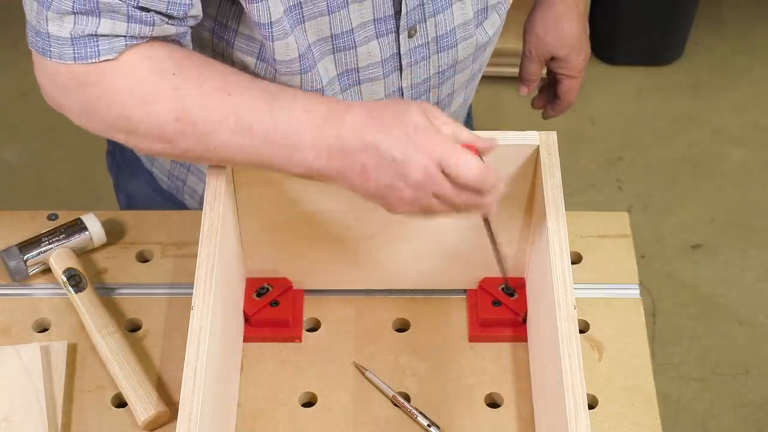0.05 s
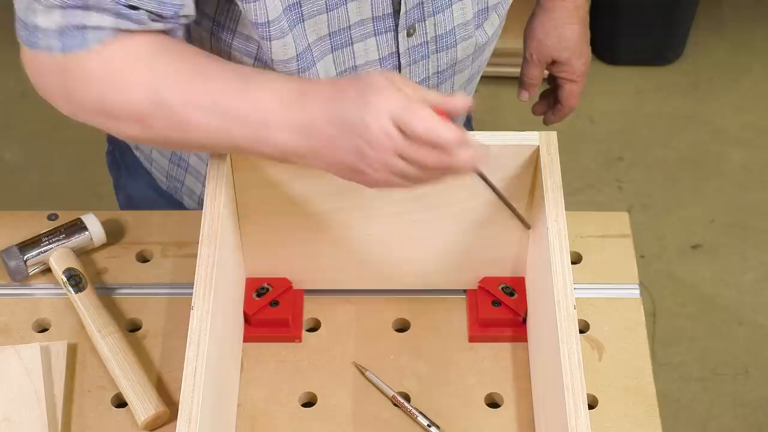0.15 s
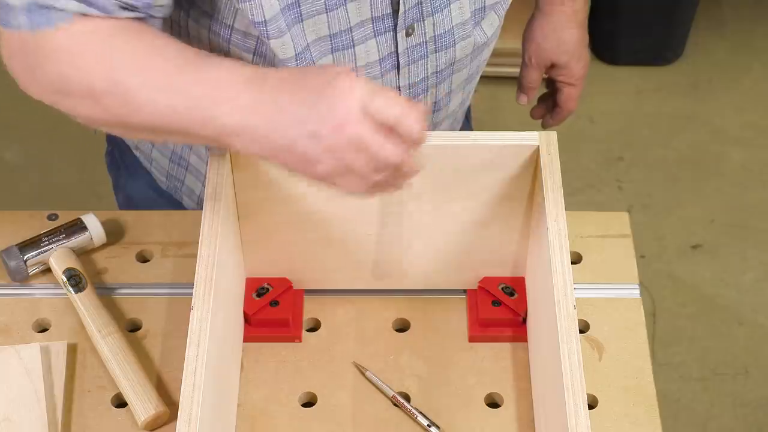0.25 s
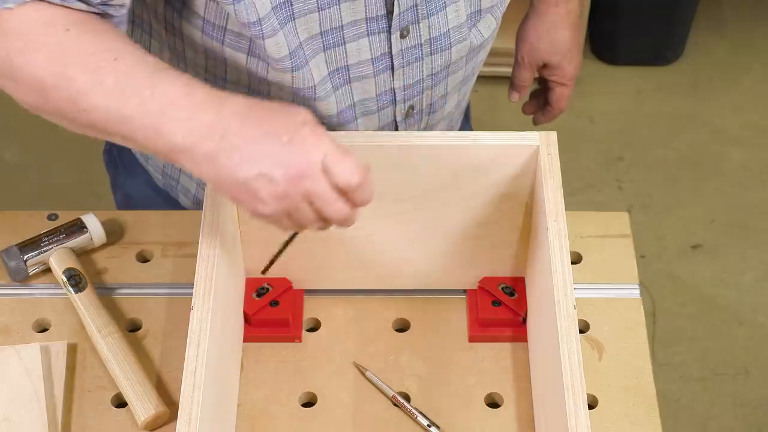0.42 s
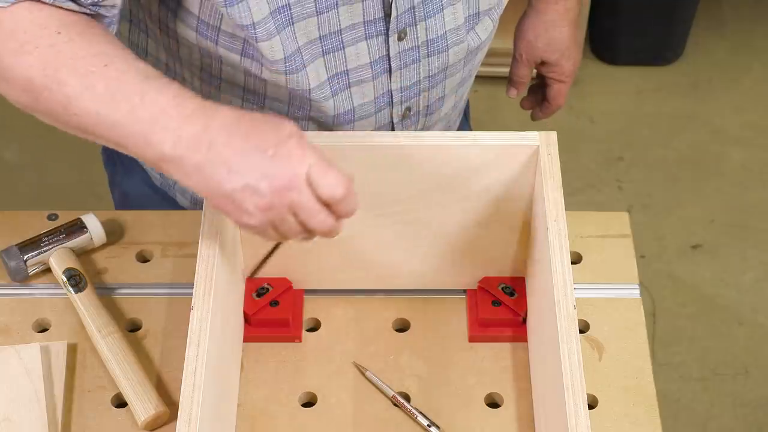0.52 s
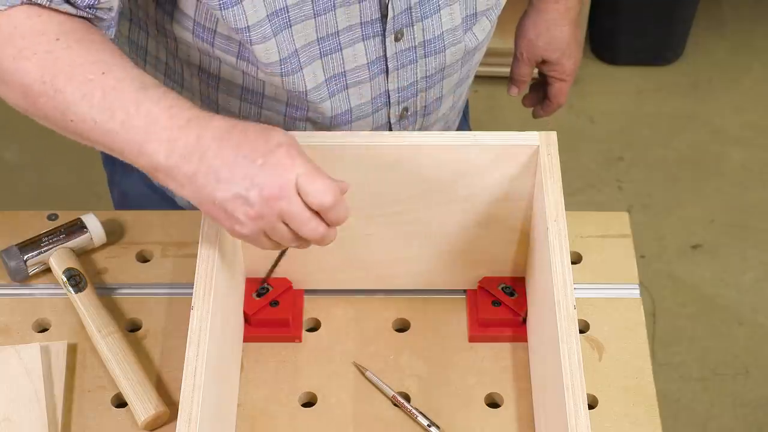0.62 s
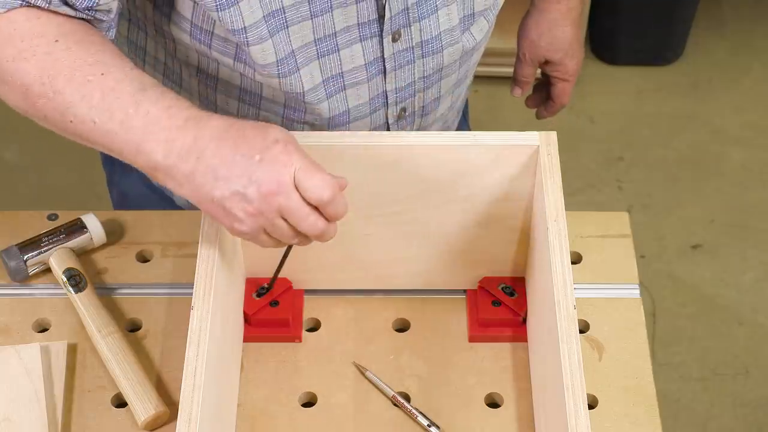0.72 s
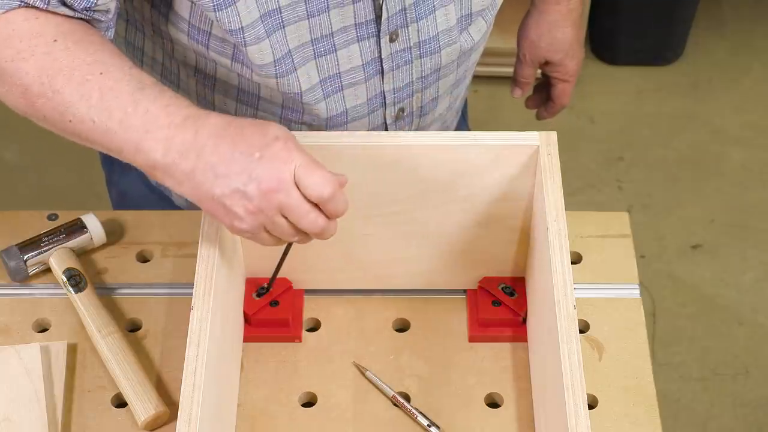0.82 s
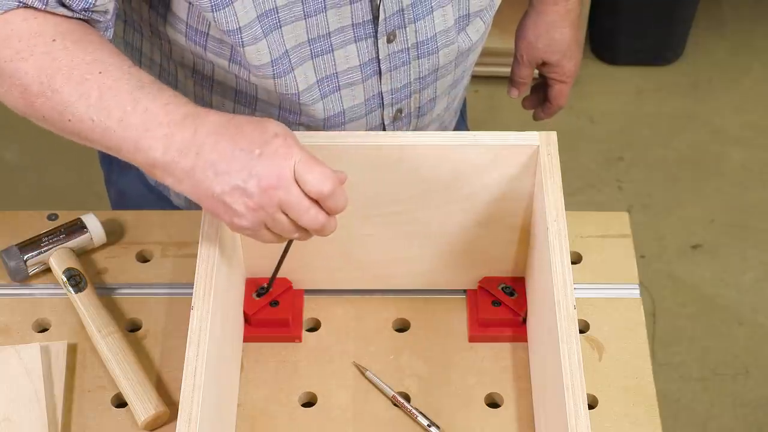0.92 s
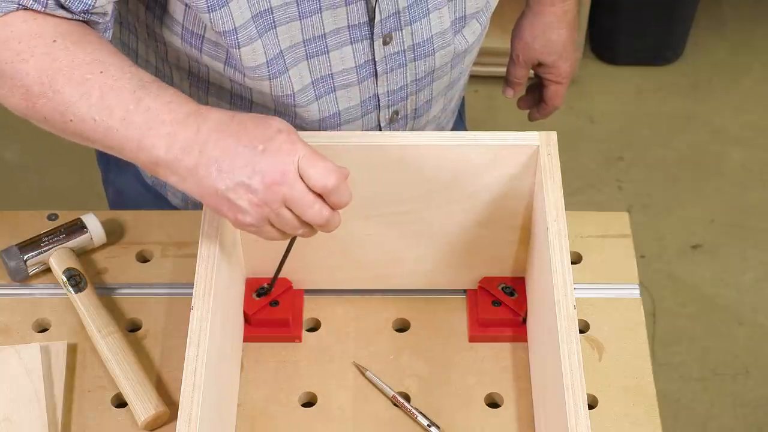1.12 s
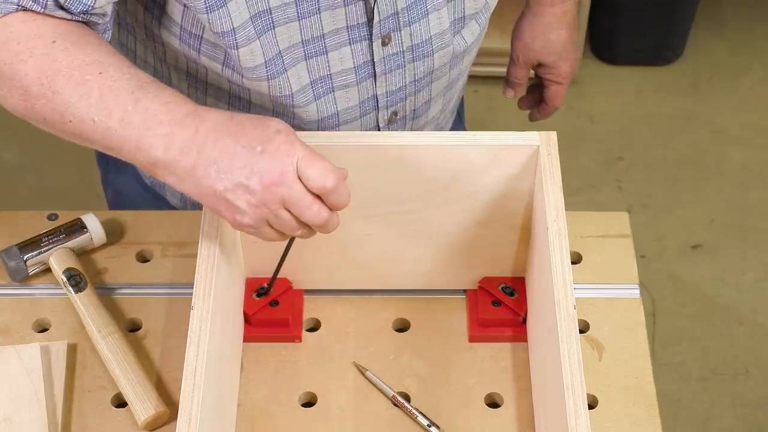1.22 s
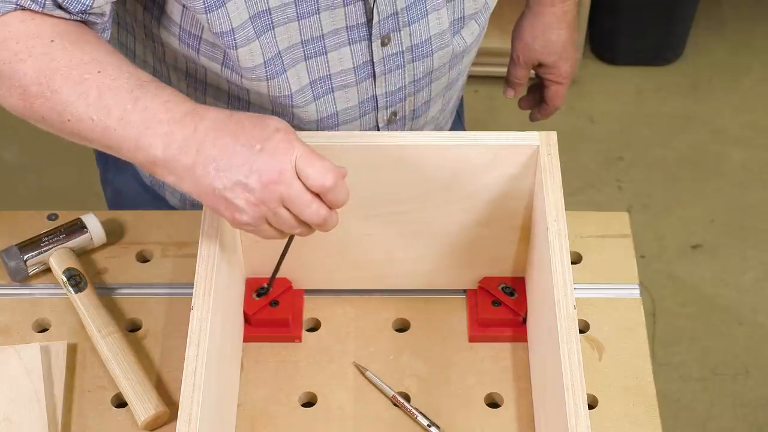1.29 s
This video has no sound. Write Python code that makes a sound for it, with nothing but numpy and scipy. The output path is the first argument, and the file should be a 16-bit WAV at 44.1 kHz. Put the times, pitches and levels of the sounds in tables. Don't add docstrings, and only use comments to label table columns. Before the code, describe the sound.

Hex key knocks loudly against a hollow plywood box, then ticks lightly into a steel clamp screw

```python
import sys
import numpy as np
from scipy import signal
from scipy.fft import rfft, irfft
from scipy.io import wavfile

SR = 44100
rng = np.random.default_rng(int(sys.argv[2]) if len(sys.argv) > 2 else 0)


def put_to_file(sound):
    columns = np.atleast_2d(sound).T
    safe = np.clip(columns, -1, 1)
    whole_steps = np.round(safe * 32767)
    wavfile.write(sys.argv[1], SR, whole_steps.astype(np.int16))


def volts_from_decibels(level):
    exponent = np.asarray(level, float) / 20
    return 10 ** exponent


N = 59535
T = np.arange(N) / SR

# frequency in Hz, level in dB, t60 in seconds.
CLAMP = [(372.3, 4, 0.089), (826, 4.5, 0.057), (1598, 7, 0.034), (2050, -14, 0.048), (2360, 4.5, 0.02),
         (3164, -15.5, 0.02), (3306, -5.5, 0.048), (4020, -5, 0.021), (5220, -16, 0.019), (1906, -6.5, .02),
         (3650, -8, 0.018), (4480, -12.5, 0.021)]
BOX = [(358, -15, 0.04), (406, -14.5, 0.056), (495.4, -22.5, 0.31), (542, -22, 0.053), (660, -11, 0.024),
       (687, -16, 0.075), (765, -34, 0.098), (825, -19, 0.12), (1120, -13.5, 0.034), (1499, -20.5, 0.081),
       (1810, -8.5, 0.032), (2052, -13.5, 0.041), (2308, -9.5, 0.025), (2430, -10, 0.015)]
SEAT = [(202, -5, 0.23), (376, 3.5, 0.13), (523, 3.5, 0.12), (675, 6.5, 0.025), (809, -1.5, 0.22),
        (1100, -0.5, 0.072), (1560, -9, 0.21), (1740, -1.5, 0.098), (2100, 0, 0.016), (2980, -6.5, 0.024),
        (3230, -6.5, 0.04)]
HOLLOW = [(345, -14, .045), (415, -9, .045), (500, 0, .042), (560, -13, .035)]
SLIP = [(1410, 0.5, 0.055), (2117, 10.5, 0.023), (3110, -6.5, 0.044), (2376, -3, 0.032), (5730, -13, 0.035)]
EDGE = [(327.4, 1.5, 0.064), (504.7, 2, 0.14), (1970, 0, 0.024), (2110, 0.5, .04), (2530, -7, 0.03),
        (2633, 2.5, 0.089), (3300, -3.5, 0.046), (3800, -6.5, .035), (6300, -5, .03), (8930, -2, 0.04)]
KEY = [(388.4, -15.5, 0.18), (875, 6, 0.023), (1086, -16, 0.055), (1511, -23.5, 0.15), (1662, 4, 0.044),
       (1886, -7, 0.039), (2117, -9, 0.039), (2423, -5, 0.028), (2494, -8, 0.051), (2642, 0.5, 0.029),
       (3220, -3.5, 0.034), (3289, 3.5, 0.041), (3390, -24, 0.24), (4230, -5.5, 0.021)]
TURN = [(421.6, -9.5, 0.24), (483, -4, 0.13), (1404, -5, 0.08), (1699, 4.5, 0.052), (1730, -10, 0.099),
        (2627, 6, 0.04), (3070, -15, 0.072), (3454, -7, 0.059), (4370, -12, 0.045), (4780, -5, 0.048),
        (6010, 5.5, 0.021)]
BACK = [(216, 10, 0.049), (391, -3, 0.14), (471, -5.5, 0.21), (1088, -11, 0.16), (1506, -15, 0.11),
        (1670, -2.5, 0.096), (1865, 1, 0.046), (2350, 0, 0.025), (2647, -8.5, 0.058), (3730, -3, 0.038),
        (4700, -15, 0.032)]
TICK = [(1650, 2, 0.0099), (2090, 2.5, 0.018), (2950, -4, .014), (3340, 1, 0.015), (5640, -11, .012)]

CONTACT_S = [.1663, .2021, .211, .2143, .2146, .2175, .232, .2415, .7084, .7677, .862, 1.0445, 1.0515,
             1.0585, 1.068, 1.0775, 1.082, 1.135, 1.249, 1.274]
# place, ring in dB, crack in dB, thud in dB, swell in ms, crack t60 in ms.
CONTACTS = [(CLAMP, -64.5, -43.5, -58.5, 0.25, 8.8), (CLAMP, -30.5, -30, -40, 0.55, 26.8),
            (EDGE, -66.5, -48.5, -68.5, 1.2, 22), (EDGE, -54, -41.5, -69, 0.51, 24),
            (BOX, -11.5, -27, -41, 1.3, 49), (HOLLOW, -3.5, -42, -44.5, 2.39, 26),
            (HOLLOW, -11.5, -48, -49.5, 2.3, 41), (HOLLOW, -13.5, -58.5, -49, 1.67, 41),
            (SEAT, -47, -64, -53.5, 0.41, 45), (KEY, -22.5, -30.5, -42, 5.5, 39),
            (EDGE, -49, -44, -58.5, 2.4, 46), (TICK, -52, -67, -78, 1.7, 13),
            (TICK, -56, -66, -72, 2.1, 11), (SLIP, -47.5, -72, -76, 4.9, 26),
            (TICK, -48, -61, -71, 1.3, 15), (TICK, -48.5, -58, -74, 2.2, 16), (TICK, -58, -69, -78, 2, 15),
            (TURN, -42.5, -40, -48, 4.6, 45), (HOLLOW, -51, -63, -49.5, 8.6, 50),
            (BACK, -45, -42.5, -50, 1.5, 33)]
# frequency in Hz, level in dB.
WOOD_CRACK = [(200, -5), (500, 6.5), (1200, 0), (2300, 2), (3900, -14), (8000, -22.5), (12000, -37.5),
              (16000, -53)]
# frequency in Hz, level in dB.
STEEL_CRACK = [(300, -16.5), (1000, 1.5), (3000, 0.5), (6000, -4), (9000, -9), (13000, -12), (16000, -32)]

SCRAPE_S = [.17, 1.048, 1.064, 1.079, .09, 1.257]
# length in seconds, steel in dB, wood in dB.
SCRAPES = [
    (0.027, -65.5, -51),
    (0.033, -66, -66),
    (0.018, -66, -72),
    (0.015, -62, -67.5),
    (0.029, -91.5, -69.5),
    (0.014, -69.5, -62),
]
# frequency in Hz, level in dB, t60 in seconds.
SCRAPE_RING = [(417, -13.5, 0.024), (1100, 0.5, 0.02), (1490, -8, 0.063), (1980, -4, 0.07),
               (2290, -2.5, .03), (3320, -4.5, 0.031), (4800, -4.5, 0.034), (6200, -5, 0.035)]
# frequency in Hz, level in dB.
WOOD_RUB = [(150, -18), (350, 7), (700, -14.5), (1100, -13), (2500, -8.5), (3500, -20), (16000, -51)]

# band centre in Hz, t60 in seconds, level in dB.
ROOM = [(120, 0.07, -34), (252, 0.51, -30), (550, 0.68, -28.5), (974, 0.57, -19.5), (1790, 0.58, -23),
        (4200, 0.52, -21.5), (7700, 1, -23.5), (13000, 0.23, -37.5)]
# frequency in Hz, level in dB.
HISS = [(24, -35.5), (40, -19), (71, -9), (87, 2.5), (204, -8.5), (237, -12), (269, -7.5), (646, -21),
        (16000, -27)]
# time in seconds, level in dB.
RUMBLE = [(0.0, -64), (0.25, -58.5), (0.582, -70.5), (0.74, -81.5), (0.92, -87), (1.35, -80)]
# time in seconds, level in dB.
SLEEVE = [(0, -1.5), (.5, -29), (.95, -13), (1.05, 7), (1.2, 6), (1.35, -3)]

HARD_DB = -40
BASS_LAG = 0.73
CRACK_SWELL = 0.42
THUD_HZ, THUD_T60_S = 387.3, 0.13
BENCH_HZ, BENCH_DB = 140, -13.5
RATTLE_HZ, BOX_RATTLE, KEY_RATTLE = 87, 0.39, 0.4
BOX_SEND_DB, BLOW_SEND_DB, RING_SEND_DB = -6.5, 4, -3
GRIT_PER_S, GRIT_DB, SCRAPE_HISS_DB = 5500, 3.5, -6.5
ECHO_S, ECHO_DB = 0.012, -13.5
ROOM_ONSET_S = 0.0078
HISS_DB, RUSTLE_DB, RUMBLE_TOP_HZ = -70, -73, 56.6
EARLIER_DB, EARLIER_T60_S = -71, 2.2


def noise():
    return rng.standard_normal(N)


def unit(x):
    return x / np.sqrt(np.mean(x ** 2))


def colour(x, points):
    freq = np.arange(len(x) // 2 + 1) * SR / len(x) + 1
    hz, db = np.array(points).T
    return irfft(rfft(x) * volts_from_decibels(np.interp(np.log(freq), np.log(hz), db)), len(x))


def band(x, hz, ratio):
    edges = [hz / ratio, min(hz * ratio, SR * 0.45)]
    return signal.sosfilt(signal.butter(2, edges, "band", fs=SR, output="sos"), x)


def ring(modes, t, rise_ms):
    hz, db, t60 = np.array(modes).T[:, :, None]
    lag = (1000 / hz) ** BASS_LAG
    swell = (1 - np.exp(-1000 * t / rise_ms / lag)) ** 2
    return (volts_from_decibels(db - 60 * t / t60) * np.sin(2 * np.pi * hz * t) * swell).sum(axis=0)


def contacts():
    near, send = np.zeros(N), np.zeros(N)
    wood = unit(colour(noise(), WOOD_CRACK))
    steel = unit(colour(noise(), STEEL_CRACK))
    body = unit(band(band(noise(), THUD_HZ, 1.373), THUD_HZ, 1.373))
    body = body + volts_from_decibels(BENCH_DB) * unit(band(noise(), BENCH_HZ, 1.72))
    shake = unit(band(noise(), RATTLE_HZ, 2.2))
    for start, (place, ring_db, crack_db, thud_db, rise_ms, crack_ms) in zip(CONTACT_S, CONTACTS):
        t = np.maximum(T - start, 0)
        hard = (ring_db > HARD_DB and place != KEY) or place == HOLLOW
        swell = 1 - np.exp(-1000 * t / rise_ms / CRACK_SWELL)
        crack = swell * volts_from_decibels(crack_db - 60 * 1000 * t / crack_ms) * (wood if hard else steel)
        thud = swell ** 2 * body * volts_from_decibels(thud_db - 60 * t / THUD_T60_S)
        tone = volts_from_decibels(ring_db) * ring(place, t, rise_ms)
        near += tone + crack + thud
        if hard:
            send += volts_from_decibels(BOX_SEND_DB) * tone * (1 + BOX_RATTLE * shake) + volts_from_decibels(BLOW_SEND_DB) * crack
        else:
            send += volts_from_decibels(RING_SEND_DB) * tone * (1 + KEY_RATTLE * shake) + crack
        send += thud
    return near, send


def scrapes():
    hits = rng.random(N) < GRIT_PER_S / SR
    grit = hits * noise() * volts_from_decibels(GRIT_DB * rng.exponential(size=N))
    steel = unit(signal.fftconvolve(grit, ring(SCRAPE_RING, T[:SR // 10], 0.2))[:N])
    steel += volts_from_decibels(SCRAPE_HISS_DB) * unit(colour(noise(), STEEL_CRACK))
    wood = unit(colour(noise(), WOOD_RUB))
    out = np.zeros(N)
    for centre, (length, steel_db, wood_db) in zip(SCRAPE_S, SCRAPES):
        stroke = np.exp(-(2 * (T - centre) / length) ** 2)
        out += (volts_from_decibels(steel_db) * steel + volts_from_decibels(wood_db) * wood) * stroke
    return out


def early_echo(near):
    return volts_from_decibels(ECHO_DB) * np.interp(T - ECHO_S, T, band(near, 4400, 4.9), left=0)


def room(x):
    tail = np.zeros(N)
    for hz, t60, db in ROOM:
        decay = volts_from_decibels(db - 60 * T / t60) / np.sqrt(t60 * SR / 14)
        tail += unit(band(noise(), hz, np.sqrt(2))) * decay
    onset = 1 - np.exp(-(T / ROOM_ONSET_S) ** 2)
    return signal.fftconvolve(x, tail * onset)[:N]


def floor():
    hiss = volts_from_decibels(HISS_DB) * unit(colour(noise(), HISS))
    rumble_band = signal.butter(3, [22, RUMBLE_TOP_HZ], "band", fs=SR, output="sos")
    rumble = unit(signal.sosfilt(rumble_band, noise())) * volts_from_decibels(np.interp(T, *np.array(RUMBLE).T))
    rustle = unit(band(noise(), 490, 3.8)) * volts_from_decibels(RUSTLE_DB + np.interp(T, *np.array(SLEEVE).T))
    earlier = unit(band(band(noise(), 324, 1.9), 250, 1.9)) * volts_from_decibels(EARLIER_DB - 60 * T / EARLIER_T60_S)
    return hiss + earlier + rumble + rustle


def scene():
    near, send = contacts()
    rub = scrapes()
    return (near + rub + early_echo(near) + room(send + rub) + floor())[None]


def roll_off(x):
    return signal.sosfilt(signal.butter(12, 15800, fs=SR, output="sos"), x)


def record(dry):
    return roll_off(dry)


dry = scene()
out = record(dry)
put_to_file(out)
```